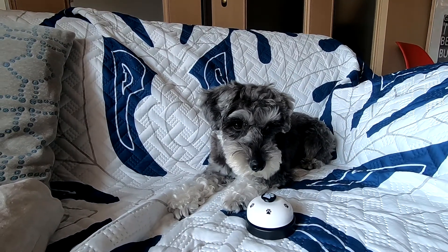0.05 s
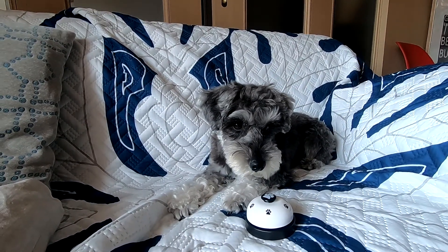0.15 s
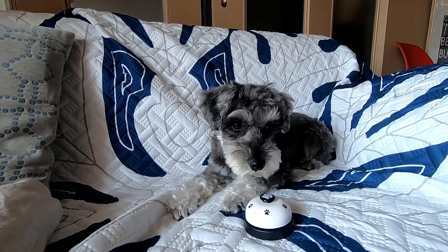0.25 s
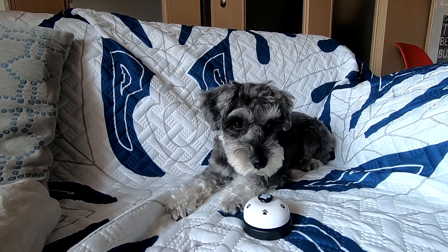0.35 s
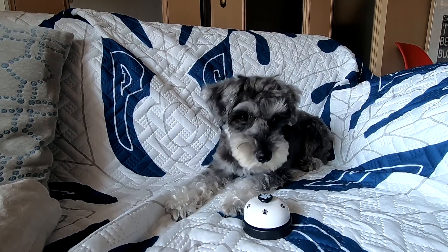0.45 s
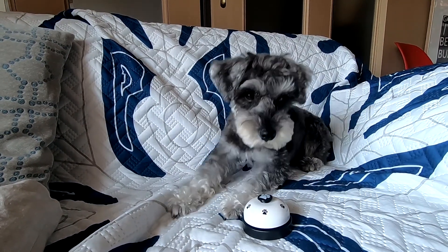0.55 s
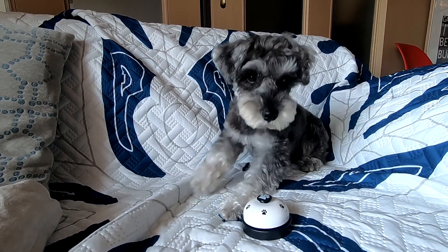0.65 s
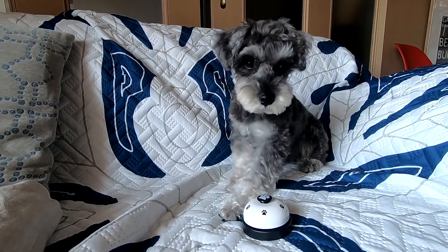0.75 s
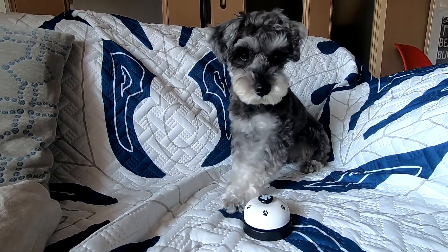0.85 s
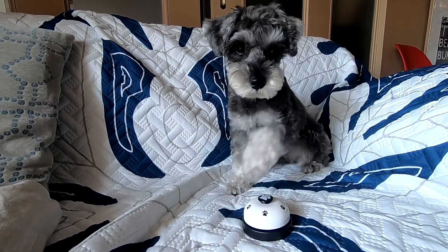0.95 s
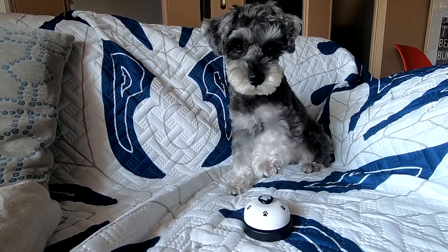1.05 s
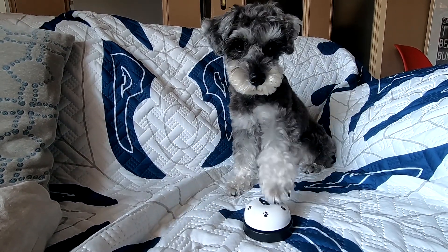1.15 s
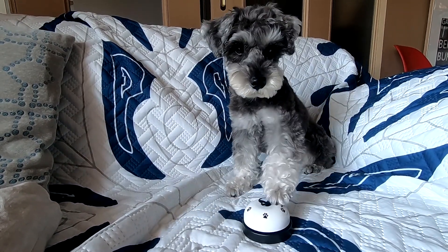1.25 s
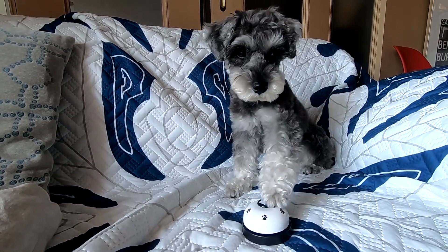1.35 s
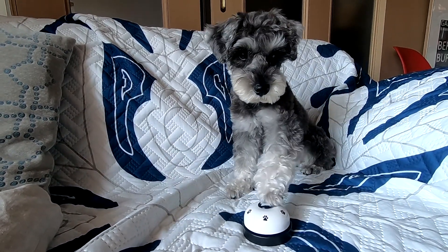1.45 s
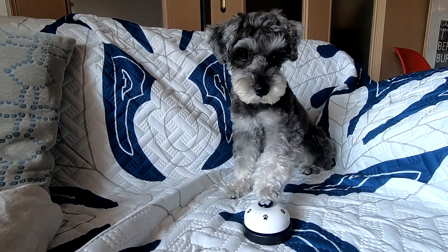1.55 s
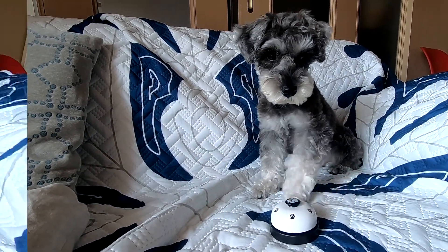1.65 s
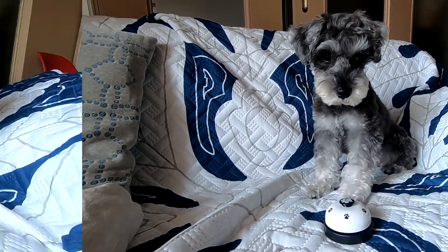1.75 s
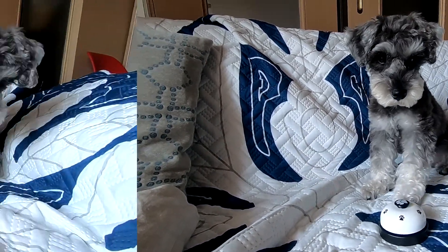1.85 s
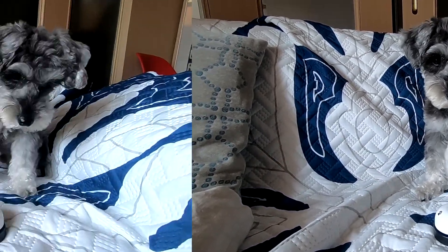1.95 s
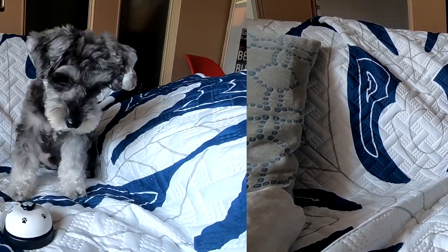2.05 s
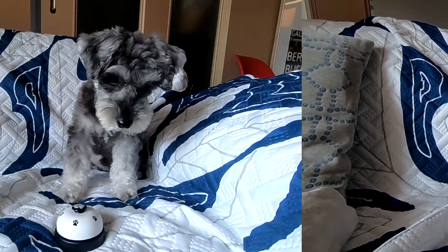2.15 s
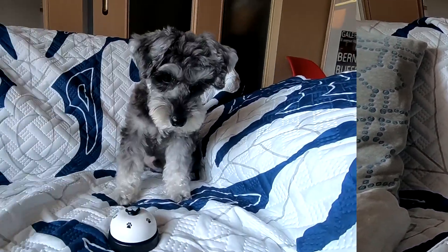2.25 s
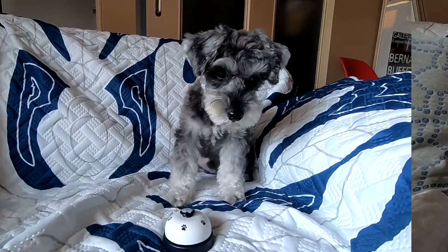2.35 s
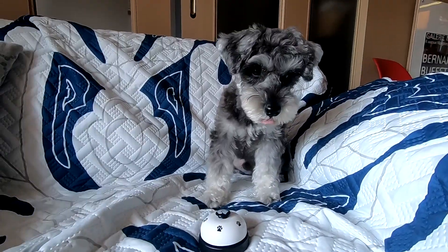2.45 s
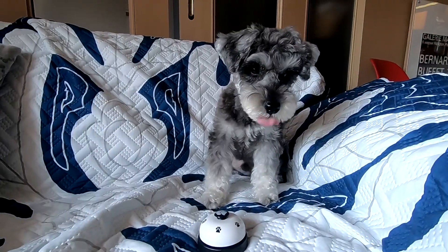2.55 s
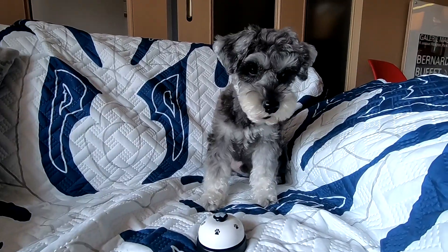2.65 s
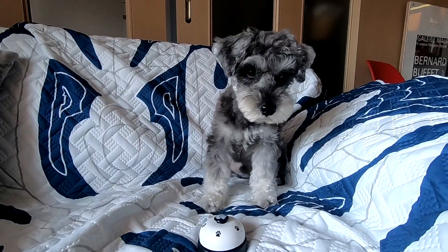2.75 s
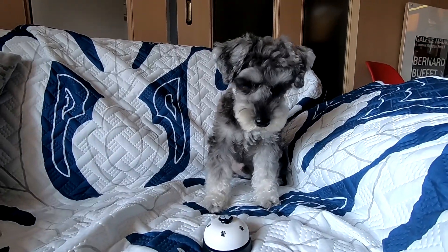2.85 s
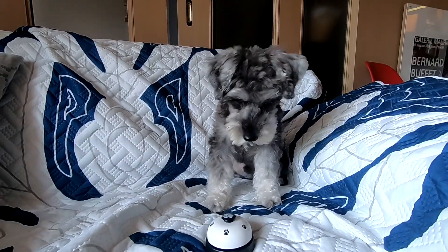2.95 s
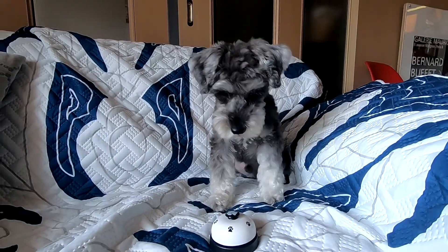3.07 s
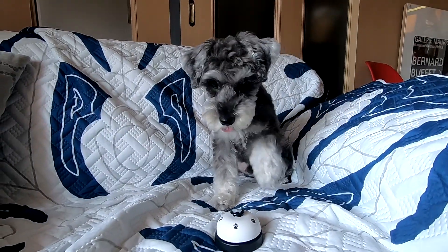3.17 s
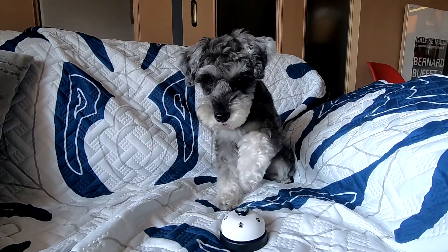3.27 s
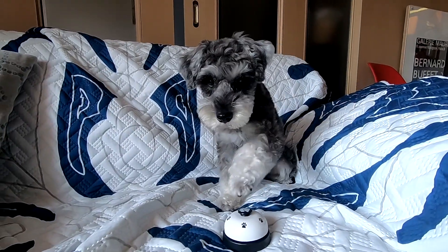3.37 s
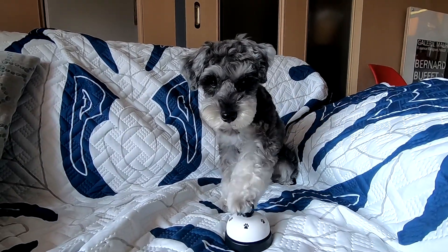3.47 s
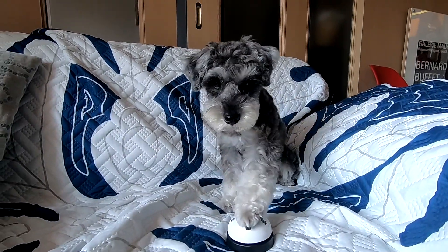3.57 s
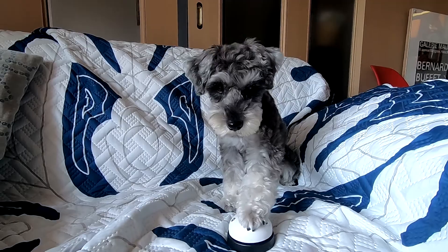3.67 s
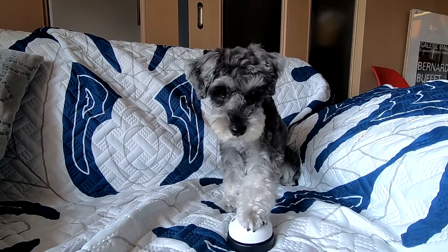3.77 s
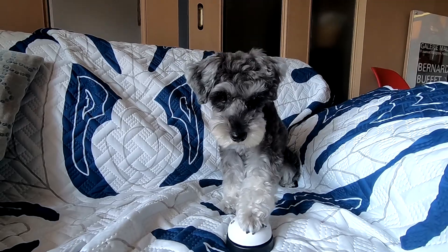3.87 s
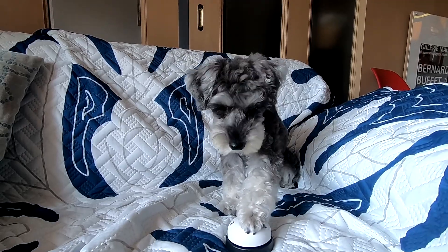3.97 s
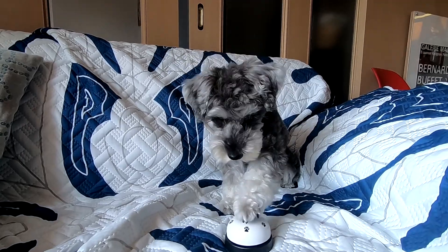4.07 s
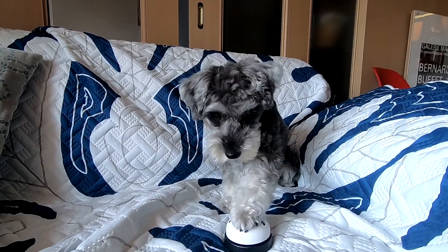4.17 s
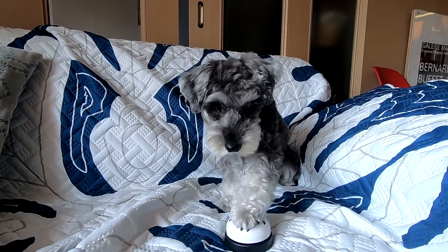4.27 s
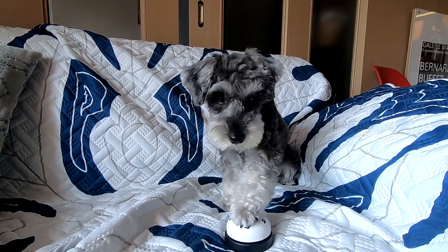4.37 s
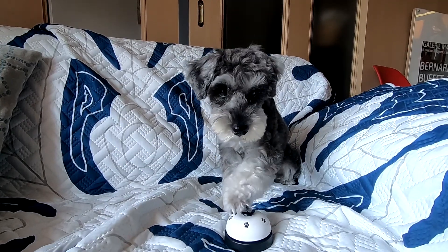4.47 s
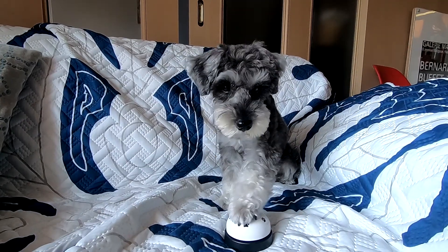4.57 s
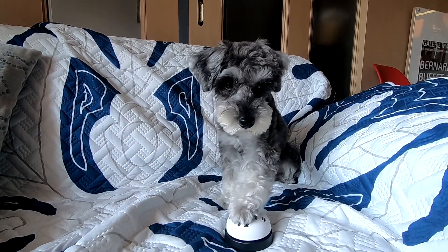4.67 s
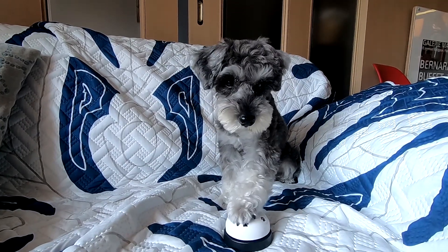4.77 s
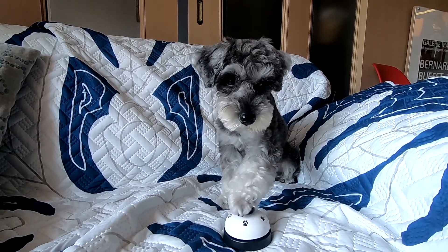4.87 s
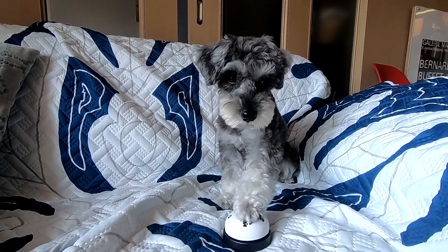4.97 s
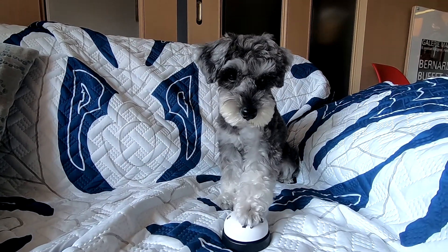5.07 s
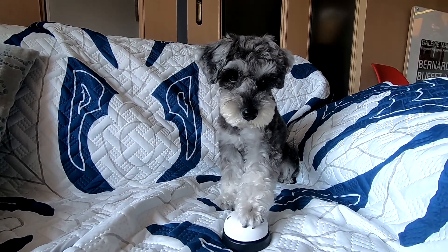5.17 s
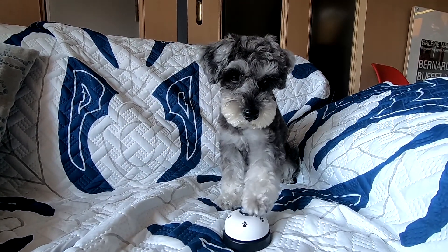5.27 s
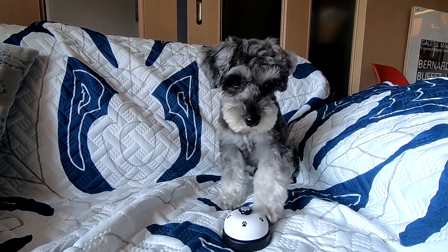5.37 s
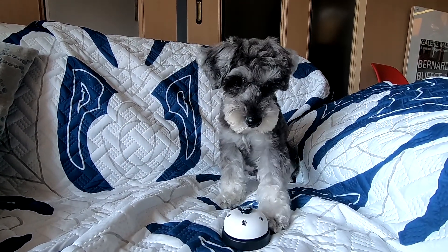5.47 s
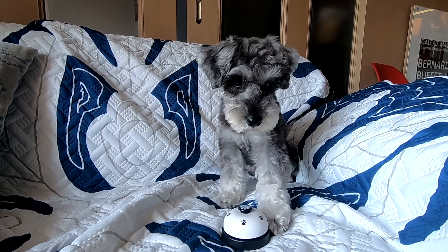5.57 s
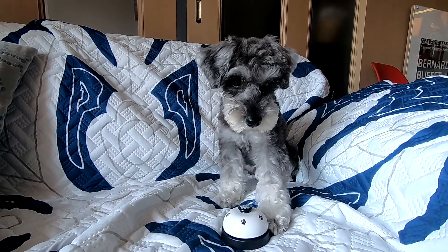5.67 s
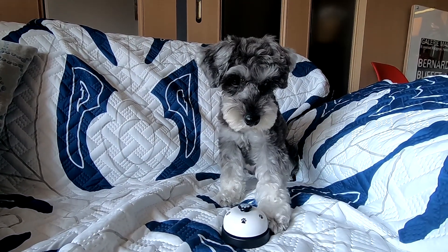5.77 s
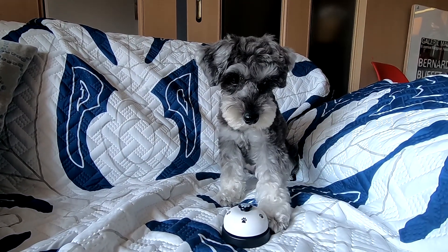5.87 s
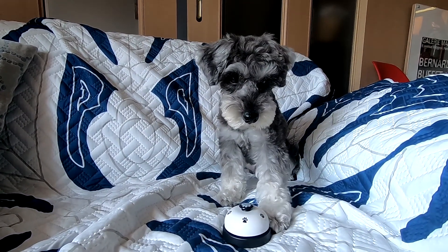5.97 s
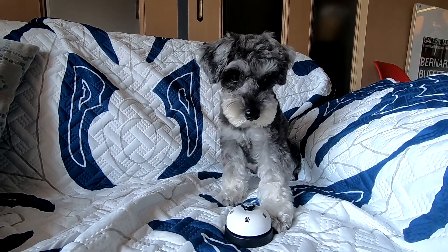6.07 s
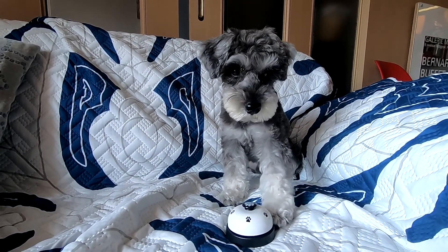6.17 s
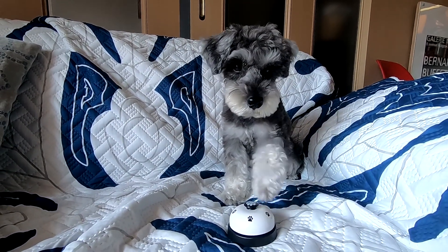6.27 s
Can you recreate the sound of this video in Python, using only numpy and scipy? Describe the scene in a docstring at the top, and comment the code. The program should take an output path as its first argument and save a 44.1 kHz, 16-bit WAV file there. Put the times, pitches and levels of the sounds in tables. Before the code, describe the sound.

A small dog's paw presses a metal desk bell six times on a quilted sofa, each clack followed by a high, clear, lingering ding.

```python
"""Dog pawing a desk call bell

A small dog on a quilted sofa paws a call bell six times in a quiet room.
Each press rattles the plunger and throws the clapper at the steel dome: noise bursts in base resonances, sine modes.
Filtered noise makes the quilt's rustle, the paws' thuds on the cushion and the ventilation's low hum."""
import sys
import numpy as np
from scipy import signal
from scipy.fft import rfft, irfft
from scipy.io import wavfile
from scipy.ndimage import uniform_filter1d

SR = 44100
rng = np.random.default_rng(int(sys.argv[2]) if len(sys.argv) > 2 else 0)


def to_wav(sig):
    """Store sig (one row per channel, or 1-D mono) as 16-bit WAV at the path in sys.argv[1].

    Samples outside -1..1 are clipped; the rate is SR.
    """
    pcm = np.clip(np.atleast_2d(sig), -1, 1) * 32767
    pcm = np.round(pcm).astype(np.int16)
    wavfile.write(sys.argv[1], SR, pcm.T)  # frames by channels


N = 279020

# room air spectrum: freq_hz, rel_density_db
AIR_SPECTRUM = [(40, -28), (70, -13), (110, -20), (160, -1), (210, -2), (260, -10), (470, -13), (750, -15),
                (1060, -21.5), (2000, -25.5), (3500, -35), (7000, -41), (10000, -47.5), (15000, -59.5)]
# low room air: time_s, rel_level_db
AIR_LEVEL = [(0.0, -65.5), (1.13, -65.5), (1.39, -68), (1.71, -67.5), (1.94, -72.5), (2.41, -72.5),
             (2.66, -64), (3.03, -65), (4.74, -69.5), (5.44, -67), (5.74, -70), (6.33, -65.5)]
# low rumble: time_s, rel_level_db
RUMBLE_LEVEL = [(0, -58), (.3, -57), (.75, -50.5), (1.4, -53.5), (1.6, -64), (2.3, -64.5), (2.7, -62),
                (4.5, -68), (5.2, -62), (6.33, -60)]
# ventilation drone: freq_hz, half_width_hz (of each resonator), level_db (rms)
HUM = [(150.7, 14, -62), (193.6, 8.4, -68.5)]
# left-right likeness of noise: freq_hz, likeness (0 to 1)
LIKENESS = [(30, .87), (150, .88), (300, 0.87), (700, 0.08), (2000, 0.18), (10000, 0.069)]
# dome still singing from an earlier ding: freq_hz, level_db, t60_s
AFTERSOUND = [(1412, -68, 8.0), (1470, -68, 12), (3780, -84, 1.5)]
# rustle spectrum: freq_hz, rel_density_db
QUILT_SPECTRUM = [(500, -2.5), (1600, 4), (3000, -4), (5000, -3.5), (7000, -10.5), (10000, -14.5),
                  (12000, -22), (14000, -30), (18000, -51)]
# fur and paws stroking the quilt: peak_s, rise_s, fall_s, rel_level_db
STROKES = [(.55, 0.17, 0.092, -63.5), (.755, 0.038, 0.029, -66), (.865, .05, 0.045, -62.5),
           (1.605, 0.11, 0.029, -66.5), (2.341, 0.021, .08, -67), (2.651, 0.042, .11, -70.5),
           (2.94, 0.025, 0.12, -72.5), (3.289, 0.1, .16, -64), (5.241, .03, 0.045, -66),
           (5.419, 0.082, 0.11, -57.5), (6.24, 0.057, 0.044, -70)]
# short dull knocks and snags (paw touching the bell, its base rocking, claws in the quilt): start_s, rel_level_db
SNAGS = [(0.869, -67), (2.392, -79), (2.466, -55), (2.502, -56), (2.619, -63.5), (2.647, -59),
         (2.932, -57.5), (3.251, -58.5), (3.39, -58), (3.687, -45.5), (6.239, -54)]
# paws landing on the cushion: start_s, rel_level_db
THUDS = [(0.743, -54.5), (0.827, -52.5), (1.167, -43), (1.389, -51), (1.642, -51.5), (2.921, -47.5),
         (3.935, -47.5), (4.204, -53.5), (4.601, -47.5), (4.97, -51), (5.445, -45.5)]
# presses: strike_s, touch_ahead_s, lever_ahead_s, fall_after_s, touch_rel_db, lever_rel_db, clatter_rel_db,
# clatter_bright_db, sag_db (scaled per mode), low_pair_damping_db_per_s, then level_db of each dome mode
STRIKES = [(1.172, .018, .004, .0295, -45.5, -36, -26.5, 0.5, 3.2, -0.5, -42.5, -38, -23, -25.5, -30, -50),
           (2.134, 0.0095, 0.00203, 0.035, -40, -35, -41, 8, 11.7, 29, -56.5, -50, -30, -45, -41, -66),
           (3.6167, 0.016, .0065, 0.038, -42, -30.5, -31.5, -5.5, 18.7, 35, -33.5, -58, -12.5, -33.5, -32.5, -53),
           (4.189, .018, 0.0079, 0.023, -38.5, -28.5, -29, -11, 6.6, 24.5, -36.5, -81.5, -14.5, -32.5, -35, -56.5),
           (4.589, 0.016, .0045, 0.025, -44.5, -26.5, -32, -3, 9.7, 62, -37.5, -70.5, -17, -34, -29, -52.5),
           (4.97, 0.018, .0058, 0.027, -53.5, -31.5, -31.5, -8.5, 14.8, 3, -35, -63, -18, -32.5, -34.5, -55.5)]
# lone plunger clicks as the paw shifts or lets it spring up: start_s, rel_level_db, bright_db
CLICKS = [(1.330, -47.5, -21.5), (1.494, -49.5, -22.5), (1.593, -46.5, 1), (3.944, -62, -4),
          (4.148, -57, 2), (4.468, -49.5, -25), (5.329, -47.5, -12), (5.362, -51.5, 3), (5.416, -50.5, -10),
          (5.441, -35.5, 8)]
# base resonances: freq_hz, width_hz, rel_level_db
BASE = [(630, 33, -5), (1342, 220, 1), (1700, 300, 1), (2630, 230, 2), (3146, 410, 4.5), (3465, 530, 5.5),
        (4980, 280, -2.5), (5500, 220, -4.5), (6300, 360, -7), (7550, 600, -9.5), (9340, 540, -10),
        (10460, 470, -8), (11050, 560, -11), (13200, 2400, -22.5)]
# clapper's own short ring: freq_hz, level_db (against the knock), t60_s
CLAPPER_MODES = [(3110, -6.5, .02), (5035, -5, 0.011)]
# dome modes, the lowest two a beating pair: freq_hz, t60_s, bloom_s, sag_share,
# left_right_db before and after IMAGE_SHIFT_S, left_lead_rad before and after it
DOME_MODES = [(1418, 4.1, .22, .9, -6.5, -3, 0.98, -0.91), (1473.6, 2.9, 0.51, 0.47, -4, -5, 0.2, -0.22),
              (3733.4, 1.56, 0.18, 0.9, 0, -0.5, -5.8, 0.17), (6614, 0.9, 0.22, 0.38, -15, -3, 1.5, -2.03),
              (9950, 0.39, 0.15, 0.3, 1, -3, -1.5, -1.73), (14040, .5, .17, .8, -0.5, -2, 1.6, 1.8)]
# slow swell of the strongest partial: time_s, gain_db
SWELL = [(1.2, 0), (1.55, 1.5), (2.0, -0.5), (2.15, 0.5), (3.7, -5.5), (5.2, -1), (5.34, 5.5), (5.8, 1),
         (6.3, 4.5)]
# resting paw stills the dome: start_s, length_s
MUTE = (2.394, 0.13)

ROOM_T60_S, CUTOFF_HZ = 0.16, 15000
STROKE_EDGE_DB = 7.5   # drop at the ends of a stroke's rise and fall
SCRAPE_REL_DB = -52   # plunger scraping down its guide
# clapper bounces once after the strike, settles once after falling back
BOUNCE_S, SETTLE_S = .008, 0.011
# contacts against the clatter level
STRIKE_DB, BOUNCE_DB, FALL_DB, SETTLE_DB = -3, -4, -2, -17.5
TOUCH_BRIGHT_DB, LEVER_BRIGHT_DB, FALL_BRIGHT_DB = -5, -6, -5
IMAGE_SHIFT_S = 2.8   # the dome's stereo image changes here
BLOOM_SHAPE = 6.7   # steepness of the bloom's end
FLUTTER_SHARE, FLUTTER_RATE_HZ = .19, 26   # of the upper partials
# two dips of the strongest partial: time after the strike, depth, shared half length
DIP_S, DIP_DB, SECOND_DIP_S, SECOND_DIP_DB, DIP_HALF_S = 0.2, 3, .35, 1, 0.062


def from_db(db):
    """Decibels to gain."""
    return 10 ** (np.asarray(db) / 20)


def rms_one(x):
    """Scale to rms 1."""
    return x / np.sqrt(np.mean(x ** 2) + 1e-20)


def in_time(rows):
    """Each column of a curve, sample by sample."""
    time_s, *columns = np.transpose(rows)
    return [np.interp(np.arange(N) / SR, time_s, column) for column in columns]


def at_hz(points, hz):
    """Read a spectrum on a log-frequency axis."""
    freq_hz, value = np.transpose(points)
    return np.interp(np.log(hz + 0.0009), np.log(freq_hz), value)


def cut(x, hz, kind, order=2):
    """Butterworth filter."""
    sos = signal.butter(order, hz, kind, fs=SR, output="sos")
    return signal.sosfilt(sos, x + 1e-18)


def resonate(x, hz, width_hz):
    """One resonance, about gain 1 on top."""
    r = np.exp(-np.pi * width_hz / SR)
    zeros = np.array([1, 0, -1]) * (1 - r * r) / 2
    poles = [1, -2 * r * np.cos(2 * np.pi * hz / SR), r * r]
    return signal.lfilter(zeros, poles, x + 1e-18)


def drift(rate_hz):
    """Random wander through 4000 knots of spread 1, then held at the last one."""
    knots = rng.standard_normal(4000)
    return np.interp(np.arange(N) / SR * rate_hz, np.arange(len(knots)), knots)


def noise(spectrum=None):
    """Stereo noise, alike on both sides in the bass and diffuse in the treble; rms 1."""
    hz = np.arange(N // 2 + 1) * SR / N
    mid, side = rfft(rng.standard_normal((2, N)))
    alike = np.clip(at_hz(LIKENESS, hz), -1, 1)
    both = np.sqrt(1 + alike) * mid + np.sqrt(1 - alike) * side * [[1], [-1]]
    colour = from_db(at_hz(spectrum, hz)) if spectrum else 1
    return rms_one(irfft(both * colour, N))


def bursts(times_s, levels_db, t60_s):
    """Envelope that jumps at each contact and dies away."""
    kicks = np.zeros(N)
    kicks[(np.asarray(times_s) * SR).astype(int)] = from_db(levels_db)
    return signal.lfilter([1], [1, -np.exp(-np.log(1000) / (t60_s * SR))], kicks + 1e-18)


def background(air_gain_db=7, hiss_db=-75, split_hz=1200, rumble_gain_db=-1, rumble_hz=52, lowest_hz=18):
    """Room air, the narrow drone of the ventilation and a low, uneven rumble."""
    air = noise(AIR_SPECTRUM)
    low_air = rms_one(cut(air, split_hz, "low", order=3))
    hiss = rms_one(cut(air, split_hz, "high", order=3))
    air = from_db(in_time(AIR_LEVEL)[0] + air_gain_db) * low_air + from_db(hiss_db) * hiss
    rumble = rms_one(cut(cut(noise(), rumble_hz, "low", order=6), lowest_hz, "high"))
    rumble = from_db(in_time(RUMBLE_LEVEL)[0] + rumble_gain_db) * rumble
    hum = 0
    for hz, half_width_hz, level_db in HUM:
        width_hz = 2 * half_width_hz
        hum = hum + from_db(level_db) * rms_one(resonate(resonate(noise(), hz, width_hz), hz, width_hz))
    return air + rumble + hum


def aftersound():
    """Decaying sines of the faint old ring, cut off by the first strike."""
    t = np.arange(N) / SR
    ring = sum(from_db(level_db) * np.exp(-np.log(1000) * t / t60_s) * np.sin(2 * np.pi * hz * t)
               for hz, level_db, t60_s in AFTERSOUND)
    return (t < STRIKES[0][0]) * ring


def stroke(peak_s, rise_s, fall_s, level_db):
    """Rounded swell of rubbing."""
    age_s = np.arange(N) / SR - peak_s
    position = age_s / np.where(age_s < 0, rise_s, fall_s)
    return from_db(level_db - np.minimum(STROKE_EDGE_DB * position ** 2, 200))


def quilt(gain_db=-1, grain_db=3.0, grain_rate_hz=420, snag_gain_db=4, snag_top_hz=2400, snag_t60_s=.06,
          scrape_fall_s=0.027):
    """Threads catch and slip in grainy rustles; short dull knocks and snags; each press scrapes briefly."""
    rubbing = sum(stroke(*row) for row in STROKES)
    for strike_s, touch_s, *_ in STRIKES:
        rubbing = rubbing + stroke(strike_s, touch_s, scrape_fall_s, SCRAPE_REL_DB)
    slide = rubbing * from_db(gain_db + grain_db * drift(grain_rate_hz)) * noise(QUILT_SPECTRUM)
    snag_s, snag_db = np.transpose(SNAGS)
    snags = bursts(snag_s, snag_db + snag_gain_db, snag_t60_s) * noise(QUILT_SPECTRUM)
    return slide + cut(snags, snag_top_hz, "low")


def cushion(puff_db=19, push_db=6, puff_t60_s=0.3, push_t60_s=0.015, thud_hz=150, width_hz=150):
    """A paw gives the seat one low push and squeezes a soft puff of noise out of it."""
    start_s, thud_db = np.transpose(THUDS)
    push = bursts(start_s, thud_db + push_db, push_t60_s)
    puff = bursts(start_s, thud_db + puff_db, puff_t60_s) * noise()
    return resonate(resonate(push + puff, thud_hz, width_hz), thud_hz, width_hz)


def sway(gain_db=-6, t60_s=0.41, top_hz=55, lowest_hz=20):
    """After each paw fall the seat wobbles on its springs: a dying low rumble."""
    start_s, thud_db = np.transpose(THUDS)
    wobble = rms_one(cut(cut(noise(), top_hz, "low", order=4), lowest_hz, "high"))
    return cut(bursts(start_s, thud_db + gain_db, t60_s) * wobble, 2 * top_hz, "low")


def contacts():
    """Every knock as (start_s, rel_level_db, bright_db): lone clicks, and six contacts per press."""
    rows = list(CLICKS)
    for s, touch_s, lever_s, fall_s, touch_db, lever_db, clatter_db, bright_db, *_ in STRIKES:
        rows += [(s - touch_s, touch_db, TOUCH_BRIGHT_DB),
                 (s - lever_s, lever_db, LEVER_BRIGHT_DB),
                 (s, clatter_db + STRIKE_DB, bright_db),
                 (s + BOUNCE_S, clatter_db + BOUNCE_DB, bright_db),
                 (s + fall_s, clatter_db + FALL_DB, FALL_BRIGHT_DB),
                 (s + fall_s + SETTLE_S, clatter_db + SETTLE_DB, FALL_BRIGHT_DB)]
    return rows


def plunger(gain_db=8.5, contact_t60_s=.009, rattle_db=-14, rattle_t60_s=0.05, grit_db=5, colour_db=4.5,
            crack_db=-12, crack_t60_s=0.0041, crack_top_hz=9000, pan_db=-2.5):
    """Each knock is a sharp crack, then chatter and a loose rattle in the resonances of the base."""
    start_s, knock_db, bright_db = np.transpose(contacts())
    # the added grit wanders for 1.6 s, then holds
    chatter = rng.standard_normal(N) * from_db(grit_db * drift(2500))
    # the grain varies, the force of the blow does not
    chatter /= np.sqrt(uniform_filter1d(chatter ** 2, size=64) + 1e-9)
    crack = chatter * bursts(start_s, knock_db + bright_db + crack_db, crack_t60_s)
    out = cut(cut(crack, 1100, "high"), crack_top_hz, "low")
    for k, (hz, width_hz, mode_db) in enumerate(BASE):
        # hard contacts favour high resonances; each lands on another spot of the base
        treble_share = at_hz([(2500, 0), (7000, 1)], hz)
        spot_db = colour_db * rng.uniform(-1, 1, len(start_s))
        force_db = knock_db + mode_db + bright_db * treble_share + spot_db
        force = bursts(start_s, force_db, contact_t60_s)
        force += bursts(start_s, force_db + rattle_db, rattle_t60_s)
        out += (-1) ** k * resonate(chatter * force, hz, width_hz)
    return from_db(gain_db + pan_db * np.array([[.5], [-.5]])) * out


def clapper():
    """The clapper pings when the lever throws it and when it falls back on its stop."""
    pings = []
    for strike_s, _, lever_s, fall_s, _, lever_db, clatter_db, *_ in STRIKES:
        pings += [(strike_s - lever_s, lever_db), (strike_s + fall_s, clatter_db + FALL_DB)]
    start_s, ping_db = np.transpose(pings)
    t = np.arange(N) / SR
    return sum(bursts(start_s, ping_db + mode_db, t60_s) * np.sin(2 * np.pi * hz * t)
               for hz, mode_db, t60_s in CLAPPER_MODES)


def dome(rise_s=0.016, first_share=0.55):
    """Each strike restarts the modes: a full bloom, a sag, then a long quiet ring."""
    t, out = np.arange(N) / SR, np.zeros((2, N))
    starts = [int(row[0] * SR) for row in STRIKES] + [N]
    waver_db = in_time(SWELL)[0]
    for row in STRIKES:
        waver_db = waver_db - DIP_DB * np.exp(-((t - row[0] - DIP_S) / DIP_HALF_S) ** 2)
        waver_db = waver_db - SECOND_DIP_DB * np.exp(-((t - row[0] - SECOND_DIP_S) / DIP_HALF_S) ** 2)
    mute_s, mute_length_s = MUTE
    stilled = np.clip((mute_s + mute_length_s - t) / mute_length_s, 0, 1) ** 2
    sides = np.array([[.5], [-.5]])
    early = t < IMAGE_SHIFT_S
    for k, (hz, t60_s, bloom_s, sag_share, pan_1_db, pan_2_db, lead_1_rad, lead_2_rad) in enumerate(DOME_MODES):
        height = np.zeros(N)
        for row, a, b in zip(STRIKES, starts, starts[1:]):
            sag_db, damping_db_per_s, *modes_db = row[8:]
            age_s = t[a:b] - t[a]
            bloom = np.exp(-(age_s / bloom_s) ** BLOOM_SHAPE)
            rise = 1 - (1 - first_share) * np.exp(-age_s / rise_s)
            shape = (bloom + (1 - bloom) * from_db(-sag_db * sag_share)) * rise
            fade = np.exp(-np.log(1000) * age_s / t60_s)
            if k < 2:   # paw damping of the lowest pair
                fade = fade * from_db(-damping_db_per_s * age_s)
            paw = stilled[a:b] if row[0] < mute_s else 1
            height[a:b] = from_db(modes_db[k]) * shape * fade * paw
        phase = 2 * np.pi * hz * t + sides * np.where(early, lead_1_rad, lead_2_rad)
        tone = np.sin(phase)
        if k == 2:   # strongest partial
            tone = tone * from_db(waver_db)
        if k > 2:   # short waves flutter at random, differently on each side
            flutter = [drift(FLUTTER_RATE_HZ) * np.sin(p) + drift(FLUTTER_RATE_HZ) * np.cos(p) for p in phase]
            tone = tone + FLUTTER_SHARE * np.array(flutter)
        out += height * from_db(np.where(early, pan_1_db, pan_2_db) * sides) * tone
    return out


def foot(gain_db=-24, t60_s=0.25, hz=580, width_hz=450):
    """Each press shoves the hollow base into the quilt with a dull knock."""
    strike_s, _, _, _, _, _, clatter_db, *_ = np.transpose(STRIKES)
    hollow = rms_one(resonate(resonate(noise(), hz, width_hz), hz, width_hz))
    return bursts(strike_s, clatter_db + gain_db, t60_s) * hollow


def room(x, wall_hz=9000, gap_s=0.0034):
    """Diffuse reflections, different at each ear, a little duller than the source."""
    t = np.arange(SR // 2) / SR
    tail = rng.standard_normal((2, len(t))) * np.exp(-np.log(1000) * t / ROOM_T60_S) * (t > gap_s)
    tail = cut(tail, wall_hz, "low", order=1)
    return signal.fftconvolve(x, tail / np.sqrt(np.sum(tail ** 2) / 2), axes=1)[:, :N]


def scene(ring_room_db=-16, knock_room_db=-3):
    """Bell, dog and background; only the dome's upper partials, and the knocks, get room reflections."""
    ring, knocks = dome(), plunger() + clapper()
    upper_ring = cut(ring, 6000, "high", order=6)
    reflections = room(from_db(ring_room_db) * upper_ring + from_db(knock_room_db) * knocks)
    bell = ring + aftersound() + knocks + reflections + foot()
    return bell + cushion() + sway() + quilt() + background()


def record(dry):
    """Steep low-pass: the top is cut."""
    sos = signal.ellip(10, .1, 80, CUTOFF_HZ, fs=SR, output="sos")
    return signal.sosfilt(sos, dry)


dry = scene()
out = record(dry)
to_wav(out)
```